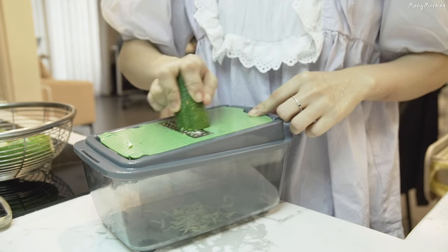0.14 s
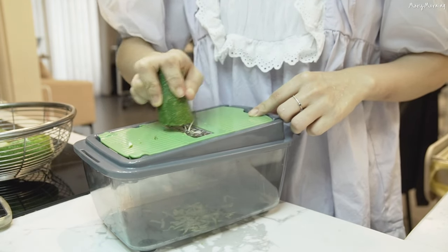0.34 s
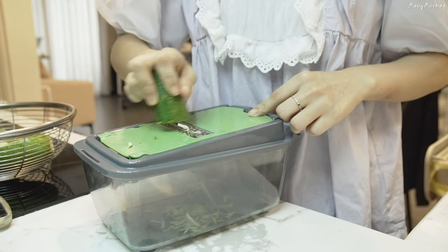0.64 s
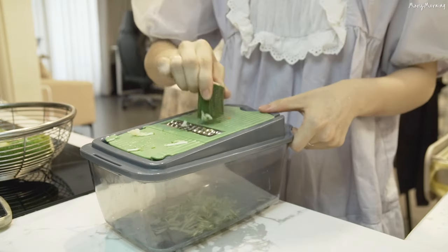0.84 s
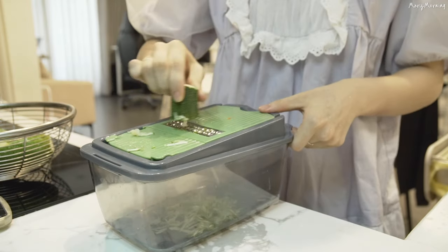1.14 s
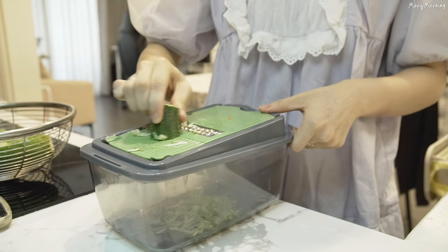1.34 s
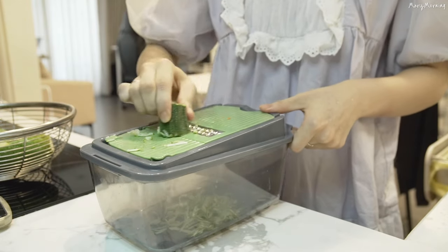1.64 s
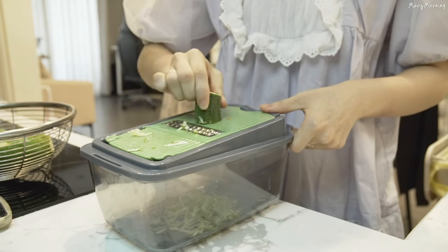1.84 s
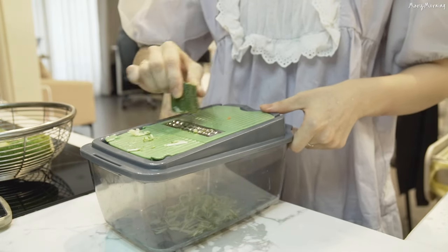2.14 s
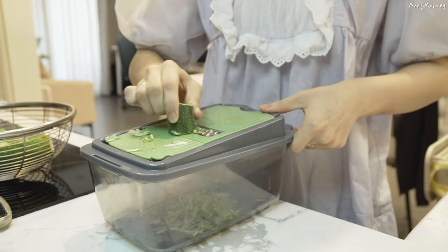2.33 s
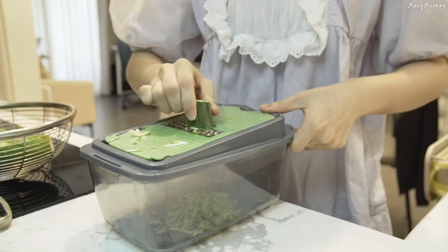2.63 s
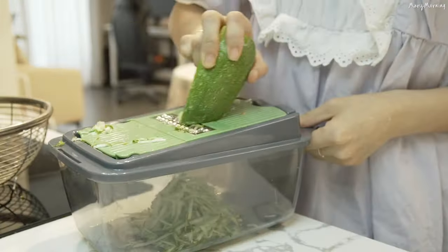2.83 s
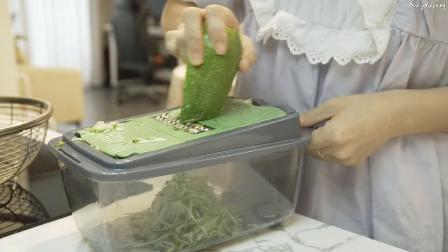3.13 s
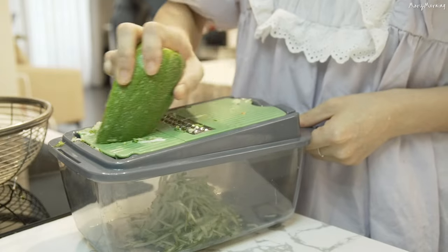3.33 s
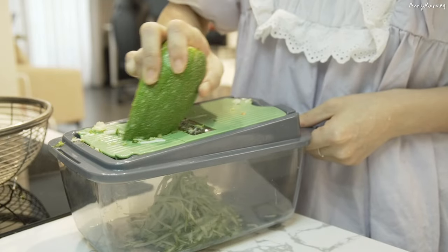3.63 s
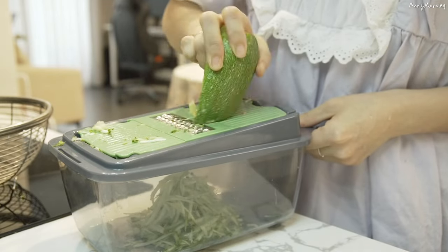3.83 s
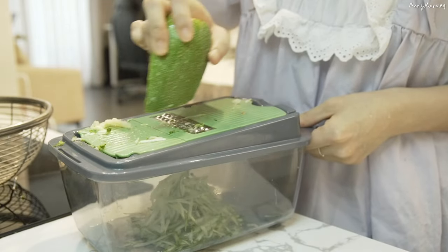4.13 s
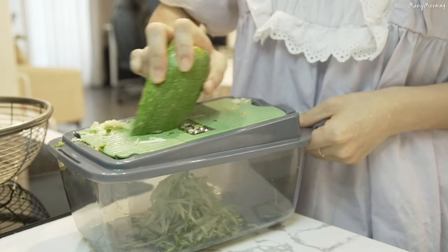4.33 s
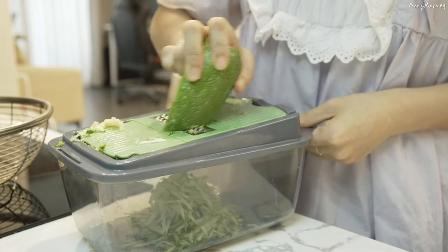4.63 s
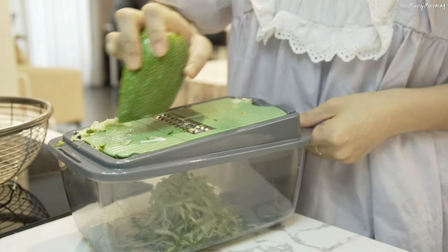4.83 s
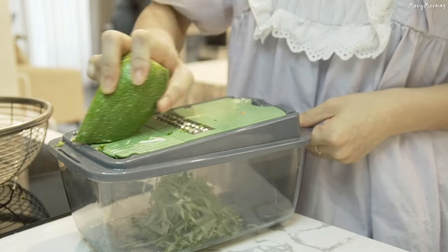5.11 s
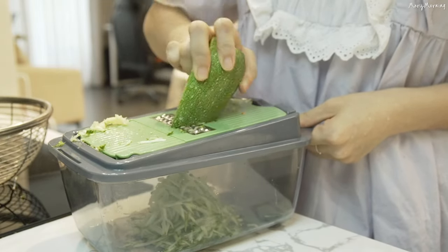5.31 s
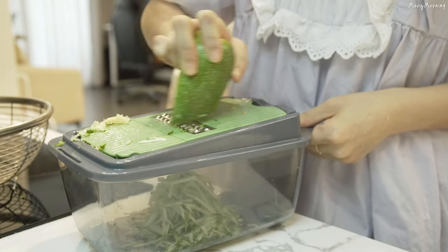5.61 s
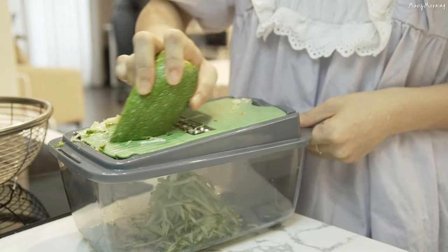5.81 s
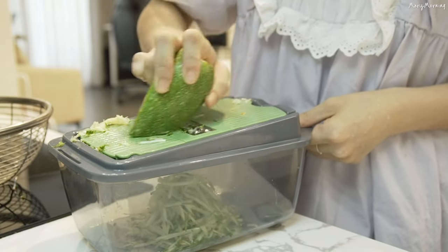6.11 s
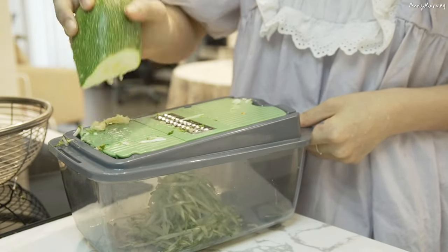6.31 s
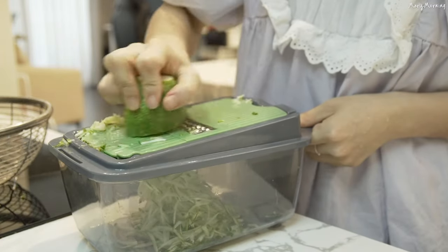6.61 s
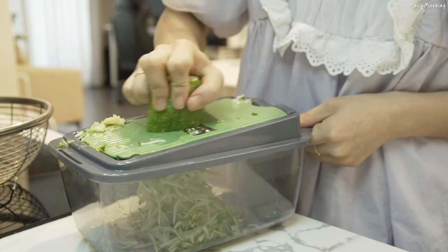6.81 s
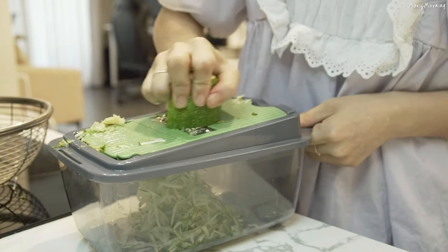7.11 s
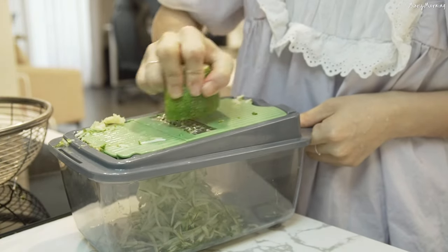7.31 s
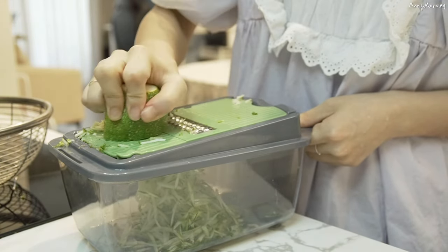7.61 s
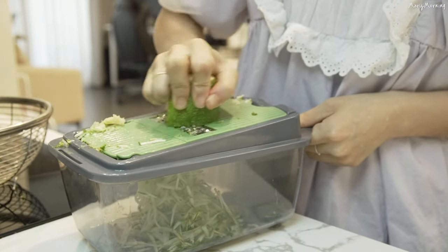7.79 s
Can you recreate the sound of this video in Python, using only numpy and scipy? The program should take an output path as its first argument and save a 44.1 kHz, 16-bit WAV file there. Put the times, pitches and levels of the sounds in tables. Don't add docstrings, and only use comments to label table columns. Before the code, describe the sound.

Steady, crunchy grating of firm zucchini on a slicer lid, about three strokes a second, with plastic clacks and hollow box thumps, close up.

```python
import sys
import numpy as np
from scipy import signal
from scipy.fft import rfft, irfft
from scipy.io import wavfile
from scipy.ndimage import uniform_filter1d

SR = 44100
rng = np.random.default_rng(int(sys.argv[2]) if len(sys.argv) > 2 else 0)


def to_wav(sig):
    pcm = np.clip(np.atleast_2d(sig), -1, 1) * 32767
    pcm = np.round(pcm).astype(np.int16)
    wavfile.write(sys.argv[1], SR, pcm.T)


def magnitude_from_level(level_db):
    exponent = np.asarray(level_db, float) / 20
    return 10 ** exponent


N = 350595

# mode_hz, width_hz, level_db
BOX_AIR_MODES = [(284, 48, -2), (322.3, 36, 4), (360, 33.3, 3), (443.8, 21, -4)]
# mode_hz, width_hz, level_db
BOX_WALL_MODES = [(128, 12, -15.5), (149.5, 20, -15), (217.7, 21.3, 5.5), (240, 46, -1), (287, 23, 2),
                  (312, 6.8, 11)]
# mode_hz, width_hz, level_db
TABLE_MODES = [(94.2, 11.3, 0.5)]
# mode_hz, width_hz, level_db
LID_MODES = [(592, 42.7, -0.5), (728.5, 16, 0), (790.3, 16.8, -0.5), (932.4, 37, -1.5), (1125, 71, -6),
             (1437, 220, -11), (1563, 53, -1), (1786, 124, -3.5), (1991, 85, -1.5), (2260, 180, -7.5),
             (2434, 20.4, -2.5), (2704, 265, -9.5)]
# mode_hz, width_hz, level_db
TOOTH_MODES = [(3400, 50, 1), (4160, 370, -1), (5000, 320, -2.5), (6100, 200, -1), (8150, 140, -9)]
# freq_hz, density_db
SNAP_SPECTRUM = [(1500, -18), (2500, -12), (2950, -6.5), (3700, -5), (4800, -8), (6100, -6), (8000, -5.5),
                 (12000, -9.5), (16000, -14.5)]
# freq_hz, gain_db
BLOW_TILT = [(5000, 10), (16000, -6)]
# freq_hz, side_minus_mid_db
STEREO_SPREAD = [(60, -52), (110, -75), (200, -26), (380, -15.5), (700, -6), (1290, -5), (2380, -4),
                 (4400, 0), (8120, 0), (15000, -1)]
# freq_hz, density_db
KITCHEN_SPECTRUM = [(30, -17), (70, -18), (90, -3), (115, -9), (350, -8.5), (1000, -8.5), (2000, -16.5),
                    (7000, -28), (8600, -29), (9500, -20), (10500, -30.5), (16000, -32)]
KITCHEN_DB = -47
ROOM_T60_S, ROOM_DB = 0.14, -13

# bite_s, rise_s, hold_s, full_hiss_db, leave_hiss_db
STUB_STROKES = [(0.0, 0.0028, 0.034, -49, -55), (0.167, 0.004, 0.13, -30, -39.5),
                (.499, 0.0072, 0.057, -30, -28), (0.716, 0.044, .012, -48, -53),
                (0.952, 0.035, 0.041, -27.5, -27), (1.263, 0.0088, 0.091, -33, -29.5),
                (1.592, 0.013, 0.094, -31, -30.5), (1.934, 0.037, 0.085, -27.5, -35.5),
                (2.28, 0.013, 0.11, -33, -33), (2.613, 0.024, 0.11, -31.5, -34)]
# bite_s, rise_s, hold_s, full_hiss_db, leave_hiss_db
LONG_STROKES = [(2.878, 0.046, 0.036, -26.5, -26.5), (3.206, 0.071, 0.044, -27, -31.5),
                (3.562, 0.073, 0.05, -24, -32), (3.882, 0.062, 0.049, -28, -27),
                (4.294, 0.039, 0.041, -25.5, -27), (4.635, 0.065, 0.038, -25, -27),
                (5.011, 0.052, 0.053, -27.5, -29), (5.367, 0.051, 0.044, -27.5, -23.5),
                (5.713, 0.064, 0.047, -25.5, -30), (6.055, 0.08, 0.053, -26, -30)]
# bite_s, rise_s, hold_s, full_hiss_db, leave_hiss_db
END_STROKES = [(6.454, 0.022, 0.085, -27.5, -31.5), (6.787, 0.045, 0.055, -27.5, -30.5),
               (7.128, 0.042, 0.069, -29.5, -30), (7.483, 0.041, 0.065, -28, -30.5),
               (7.819, 0.046, 0.14, -27, -35.5)]
# bite_below_full_db, leave_drop_db, drop_s, slide_fade_db_per_s, lid_over_hiss_db
CUT_SHAPES = [
    (6, 11.5, 0.024, 189, 6.5),
    (19.5, 15, 0.044, 189, 5.5),
    (11.5, 15.5, 0.036, 190, 6),
]
CONTACT_S, REST_DB = 0.009, -63
LID_GAIN_PER_DB, LID_MOST_DB, FULL_CUT_DB = 0.22, 5.5, -26.5
HANDS_DB = -44

PIECE_START_S = [0, 2.83, 6.3]
LANDING_RING_HZ = [1780, 2215, 1750]
LANDING_RING_DB = [-8.5, -6, -16.5]
BOX_DRIVE_DB = [-4, -3.5, -4]
PRESS_DB = [-14.5, -11, -13]

# start_s, peak_db, crack_over_peak_db, dull_over_peak_db
LANDINGS = [(0.1252, -12.5, -12.5, -2.5), (0.4625, -24.5, -11, 6.5), (0.9203, -20.5, -38, 2.5),
            (1.2432, -17.5, -42, 3.5), (1.558, -21, -29, 5.5), (1.8902, -32.5, -8, 10.5),
            (2.257, -18, -17, 5.5), (2.603, -9, -29, -4.5), (2.8453, -15.5, -16, -6), (3.1822, -20, -8, -6),
            (3.525, -12, -5.5, -8), (3.8662, -9.5, -5.5, -11), (4.229, -14, -9.5, -9.5),
            (4.591, -9.5, -7, -9.5), (4.9721, -9.5, -8, -8), (5.341, -18, -9.5, -6.5),
            (5.6812, -22, -16, -8.5), (6.0427, -13.5, -10.5, -13.5), (6.3908, -22.5, -30, -5.5),
            (6.736, -24.5, -17, -0.5), (7.0835, -29.5, -9, -3), (7.419, -28, -37, -6),
            (7.765, -18.5, -22, -7.5)]
# start_s, peak_db, ring_hz, crack_over_peak_db, dull_over_peak_db
TICKS = [(0.6858, -19.5, 1590, -14, -5.5), (0.7377, -35.5, 1620, -3, 2), (0.7674, -45, 1620, -12, -9),
         (1.7594, -34, 1630, 1, 5.5), (1.8607, -34, 1870, -16, -7), (1.944, -11, 1780, -18, -27),
         (2.0817, -23.5, 2170, -6, -4), (2.175, -20.5, 1510, -45, -12), (2.2223, -18, 1970, -33, -18),
         (3.1582, -28, 2660, -12, -5), (3.5164, -18.5, 2160, -20, -13), (3.8087, -25.5, 1574, -15, -17),
         (4.125, -25, 1940, -27, -7), (4.5655, -32.5, 1630, -6, -6), (5.1491, -13.5, 1510, -29, -4),
         (5.9244, -40, 1700, -2, -7), (6.9544, -25.5, 1440, -12, -9)]
# start_s, peak_db, boom_hz
LAND_JOLTS = [(.127, -6.5, 373), (.459, -5.5, 381), (.917, -11.5, 444), (1.235, -11, 444),
              (1.56, -9.5, 440), (1.891, -18, 435), (2.256, -8, 371), (2.6, -12, 438), (2.843, -18, 394),
              (3.186, -22, 349), (3.529, -15, 360), (3.869, -16, 372), (4.228, -19, 360), (4.595, -14, 351),
              (4.975, -13.5, 366), (5.342, -16.5, 358), (6.044, -23, 342), (6.394, -16.5, 339),
              (6.735, -22.5, 348), (7.08, -17.5, 363), (7.418, -21.5, 393), (7.757, -23.5, 360)]
# start_s, peak_db, boom_hz
CATCH_JOLTS = [(.514, -16.5, 430), (1.315, -11, 349), (1.977, -14, 313), (2.911, -19, 312),
               (3.272, -8, 317), (3.315, -15, 330), (3.611, -22, 334), (3.645, -10, 337), (3.951, -9, 322),
               (4.31, -18, 354), (4.34, -16.5, 341), (4.676, -17, 333), (4.715, -26, 360),
               (5.065, -11.5, 340), (5.431, -10.5, 329), (5.745, -21, 330), (5.789, -24, 312),
               (6.15, -24, 343), (6.477, -13.5, 348), (6.503, -14.5, 340), (6.843, -20, 313),
               (6.868, -14, 320), (7.194, -18, 353), (7.559, -17, 328), (7.863, -15, 312),
               (7.934, -14, 330)]
# start_s, peak_db, boom_hz
SLIP_JOLTS = [(.38, -30, 350), (.435, -26, 350), (.623, -14, 344), (.696, -26.5, 353), (.767, -21.5, 371),
              (1.071, -14, 360), (1.408, -14, 361), (1.433, -21.5, 344), (1.759, -18, 358),
              (2.426, -23, 304), (2.448, -10, 349), (2.528, -28, 353), (3.007, -17, 323), (3.37, -24, 346),
              (4.042, -14, 353), (4.067, -18, 343), (4.411, -8, 332), (4.444, -20.5, 358), (4.779, -9, 337),
              (4.803, -15, 344), (5.151, -10, 315), (5.514, -15.5, 337), (5.66, -29, 343), (5.85, -26, 350),
              (6.218, -10.5, 364), (6.556, -14, 331), (6.954, -25.5, 377), (7.244, -20, 359),
              (7.599, -17, 310)]
LAND_THUD_DB, CATCH_THUD_DB, SLIP_THUD_DB = -11, -32, -14.5
STUB_WEIGHT_DB = 2


def level(x, db):
    return x * magnitude_from_level(db) / np.sqrt(np.mean(x ** 2))


def ring(x, modes):
    out = np.zeros(len(x))
    for k, (hz, width_hz, db) in enumerate(modes):
        b, a = signal.iirpeak(hz, hz / width_hz, fs=SR)
        out += (-1) ** k * magnitude_from_level(db) * signal.lfilter(b, a, x)
    return out


def colour(x, spectrum):
    hz, db = np.transpose(spectrum)
    grid_hz = np.maximum(np.arange(2049) * SR / 4096, 1)
    log_gain = np.interp(np.log(grid_hz), np.log(hz), db) * np.log(10) / 20
    cepstrum = irfft(log_gain)
    cepstrum[1:2048] *= 2
    cepstrum[2049:] = 0
    response = irfft(np.exp(rfft(cepstrum)))
    return signal.fftconvolve(x, response)[:len(x)]


def add(out, start_s, sound):
    i = int(start_s * SR)
    out[i:i + len(sound)] += sound[:N - i]


def piece_at(time_s):
    return np.searchsorted(PIECE_START_S, time_s, "right") - 1


def kitchen_air():
    return level(colour(rng.standard_normal(N), KITCHEN_SPECTRUM), KITCHEN_DB)


def snaps(per_s, scatter_db):
    happens = rng.random(N) < per_s / SR
    size = np.minimum(rng.exponential(size=N), 4)
    sign = rng.standard_normal(N)
    return level(happens * magnitude_from_level(scatter_db * size) * sign, 0)


def flutter(per_s, depth_db):
    hold = int(SR / per_s)
    steps = np.repeat(rng.standard_normal(2048), hold)[:N]
    return magnitude_from_level(depth_db * uniform_filter1d(steps, hold))


def pressure():
    t = np.arange(N) / SR
    hiss_db = np.full(N, float(REST_DB))
    for strokes, shape in zip((STUB_STROKES, LONG_STROKES, END_STROKES), CUT_SHAPES):
        bite_db, drop_db, drop_s, fade_db_per_s, _ = shape
        for bite_s, rise_s, hold_s, full_db, leave_db in strokes:
            corners_s = bite_s + np.cumsum([-CONTACT_S, CONTACT_S, rise_s, hold_s, drop_s, 1])
            slide_db = leave_db - drop_db
            corners_db = [REST_DB, full_db - bite_db, full_db, leave_db, slide_db, slide_db - fade_db_per_s]
            hiss_db = np.maximum(hiss_db, np.interp(t, corners_s, corners_db))
    lid_over_hiss_db = np.transpose(CUT_SHAPES)[-1][piece_at(t)]
    light_cut_db = np.minimum(LID_GAIN_PER_DB * (FULL_CUT_DB - hiss_db), LID_MOST_DB)
    return hiss_db, hiss_db + lid_over_hiss_db + light_cut_db


def blade(tear):
    singing = sum(ring(tear, [mode]) * flutter(per_s=40, depth_db=7.5) for mode in TOOTH_MODES)
    return level(colour(tear, SNAP_SPECTRUM), -0.27) + level(singing, -9.0)


def rasp():
    hand = flutter(per_s=90, depth_db=2.0)
    tear, across = (snaps(per_s=11000, scatter_db=1.5) * hand for _ in range(2))
    drag = snaps(per_s=2300, scatter_db=3.5) * flutter(per_s=45, depth_db=2.0)
    hiss_db, lid_db = pressure()
    hiss_gain, lid_gain = magnitude_from_level(hiss_db), magnitude_from_level(lid_db)
    held = piece_at(np.arange(N) / SR)

    rattle = level(ring(tear + 0.59 * drag, LID_MODES), -1.22)
    pressed = level(ring(drag, LID_MODES[:1]), 0) * magnitude_from_level(np.array(PRESS_DB)[held])
    bright = blade(tear) * hiss_gain + (rattle + pressed) * lid_gain
    wide = blade(across) * hiss_gain + level(ring(across, LID_MODES), -0.95) * lid_gain

    force = magnitude_from_level(np.array(BOX_DRIVE_DB)[held]) * lid_gain + magnitude_from_level(HANDS_DB - 7.5)
    push = drag * force / np.std(ring(drag, BOX_AIR_MODES))
    walls = magnitude_from_level(-17.5) * ring(push, BOX_WALL_MODES)
    table = magnitude_from_level(-14.5) * ring(ring(push, TABLE_MODES), TABLE_MODES)
    return bright + ring(push, BOX_AIR_MODES) + walls + table, wide


def echoes(t60_s, gap_s):
    t = np.arange(SR // 2) / SR
    tail = rng.standard_normal(len(t)) * magnitude_from_level(-60 * t / t60_s) * (t > gap_s)
    return tail / np.sqrt(np.sum(tail ** 2))


def taps():
    out, t = np.zeros(N), np.arange(4096) / SR
    landings = [(s, db, LANDING_RING_HZ[piece_at(s)], *mix) for s, db, *mix in LANDINGS]
    hits = sorted(landings + list(TICKS))
    contact = (1 - np.exp(-t / 0.00018)) * (np.exp(-t / 0.011) + 0.63 * np.exp(-t / 0.019))
    for start_s, peak_db, ring_hz, crack_db, dull_db in hits:
        burst = rng.standard_normal(len(t)) * contact
        mode_shift_db = 3 * rng.standard_normal(len(LID_MODES))
        struck = [(hz, width_hz, db + shift) for (hz, width_hz, db), shift in zip(LID_MODES, mode_shift_db)]
        crack = colour(colour(burst, SNAP_SPECTRUM), BLOW_TILT)
        rattle = ring(burst, struck[5:])
        dull = ring(burst, struck[:5])
        tone = ring(burst, [(ring_hz, 45, 0), (1.12 * ring_hz, 140, -7)])
        tone_db = LANDING_RING_DB[piece_at(start_s)]
        parts = [(crack, crack_db + 3), (rattle, -4), (dull, dull_db + 0.23), (tone, tone_db)]
        tap = sum(magnitude_from_level(db) * part / np.abs(part).max() for part, db in parts)
        add(out, start_s - 0.0012, magnitude_from_level(peak_db) * tap)
    return out


def jolts():
    out, t = np.zeros(N), np.arange(4096) / SR
    swell = 1 - np.exp(-(t / 0.0045) ** 2)
    upper = 0.14 * np.sin(2 * np.pi * BOX_AIR_MODES[3][0] * t) * np.exp(-t / 0.034)
    lower = 0.18 * np.sin(2 * np.pi * BOX_AIR_MODES[0][0] * t) * np.exp(-t / 0.021)
    blow = np.exp(-t / 0.00092)
    thud = ring(blow, BOX_WALL_MODES) + magnitude_from_level(-11) * ring(blow, TABLE_MODES)
    thud = thud / np.abs(thud).max()
    kinds = [(LAND_JOLTS, LAND_THUD_DB), (CATCH_JOLTS, CATCH_THUD_DB), (SLIP_JOLTS, SLIP_THUD_DB)]
    for events, thud_db in kinds:
        for start_s, peak_db, boom_hz in events:
            boom = np.sin(2 * np.pi * boom_hz * t) * np.exp(-t / 0.014)
            weight_db = STUB_WEIGHT_DB * (piece_at(start_s) == 0)
            jolt = swell * (boom + upper - lower) + magnitude_from_level(thud_db - 5.5 + weight_db) * thud
            add(out, start_s - 0.002, magnitude_from_level(peak_db + 3.5) * jolt)
    return out


def scene():
    scrape, wide = rasp()
    direct = scrape + taps() + jolts()
    room, room_side = (signal.fftconvolve(direct, echoes(ROOM_T60_S, 0.0036))[:N] for _ in range(2))
    near = signal.fftconvolve(direct, echoes(0.053, 0.00017))[:N]
    mid = direct + magnitude_from_level(ROOM_DB) * room + kitchen_air()
    spread = magnitude_from_level(-5.5) * near + magnitude_from_level(-6) * wide + magnitude_from_level(ROOM_DB - 2.0) * room_side + kitchen_air()
    side = colour(spread, STEREO_SPREAD)
    balance_db = np.array([[0.45], [-0.45]])
    return np.array([mid + side, mid - side]) * magnitude_from_level(balance_db)


def roll_off(x):
    return signal.sosfilt(signal.butter(12, 16480, fs=SR, output="sos"), x)


def record(dry):
    bass_cut = signal.butter(2, 70, "high", fs=SR, output="sos")
    top_cut = signal.ellip(8, 0.2, 50, 15900, fs=SR, output="sos")
    mix = signal.sosfilt(top_cut, signal.sosfilt(bass_cut, dry))
    return roll_off(mix)


dry = scene()
out = record(dry)
to_wav(out)
```